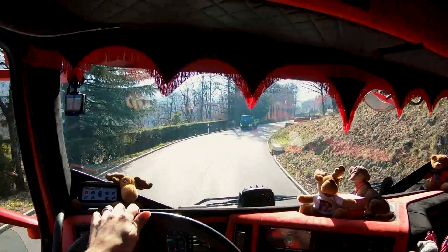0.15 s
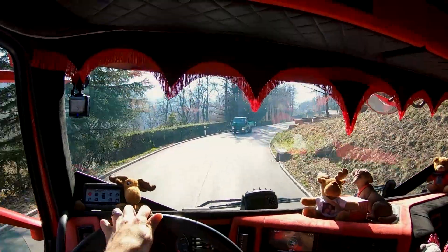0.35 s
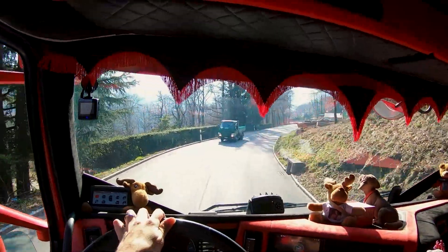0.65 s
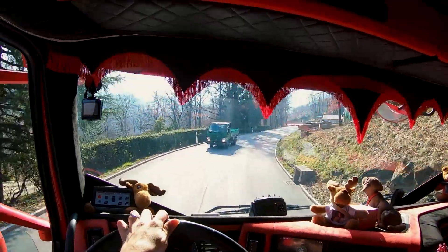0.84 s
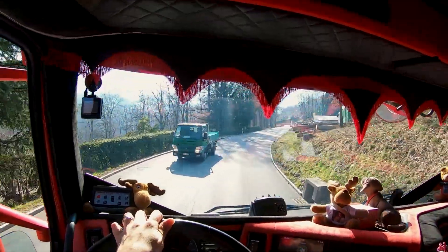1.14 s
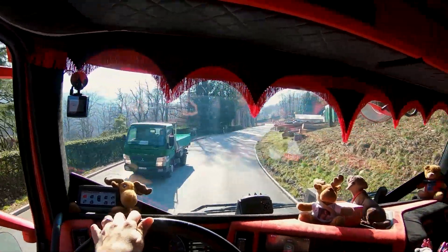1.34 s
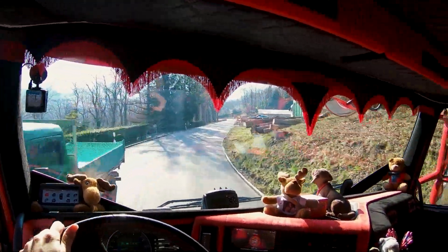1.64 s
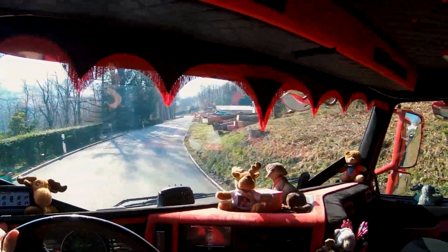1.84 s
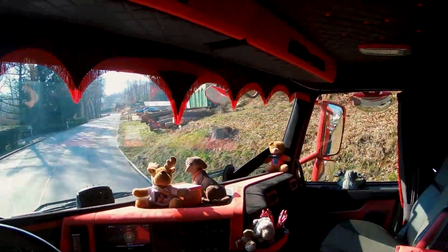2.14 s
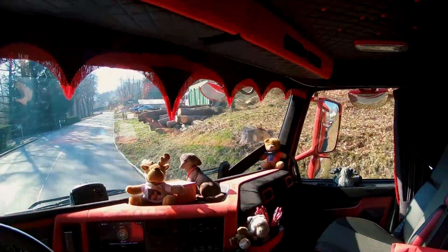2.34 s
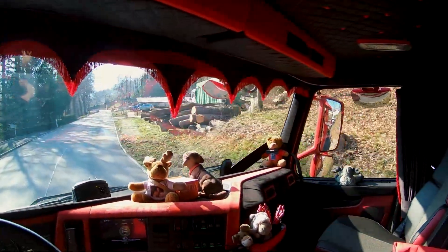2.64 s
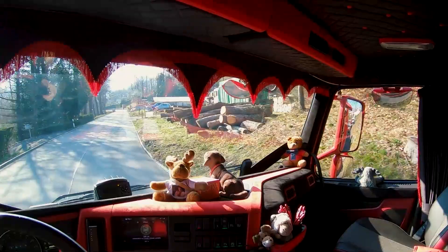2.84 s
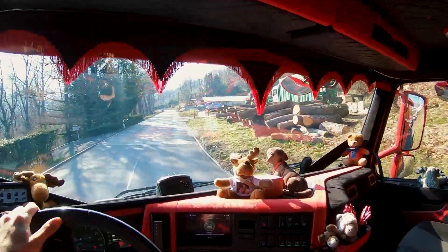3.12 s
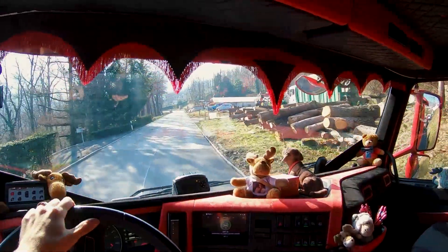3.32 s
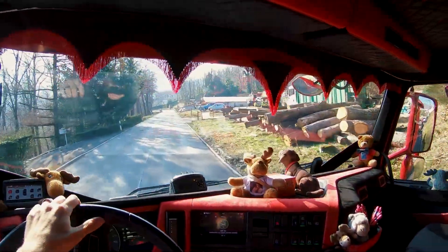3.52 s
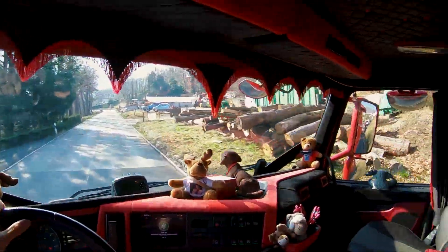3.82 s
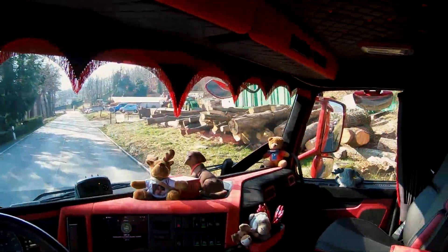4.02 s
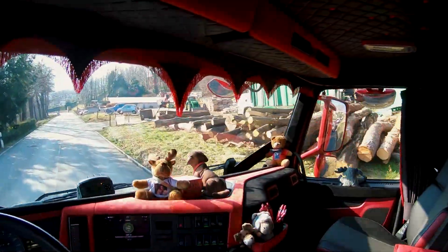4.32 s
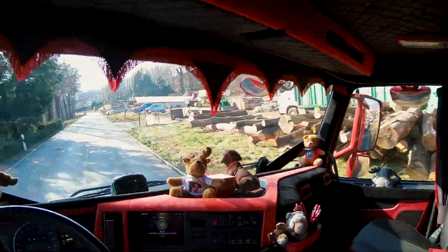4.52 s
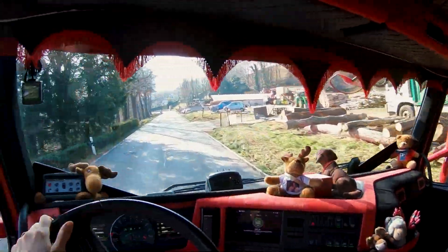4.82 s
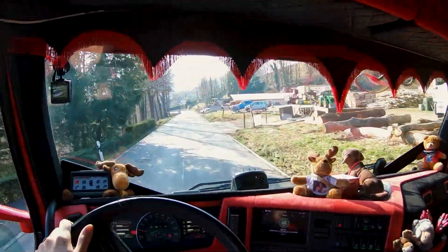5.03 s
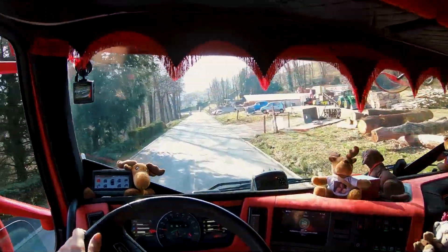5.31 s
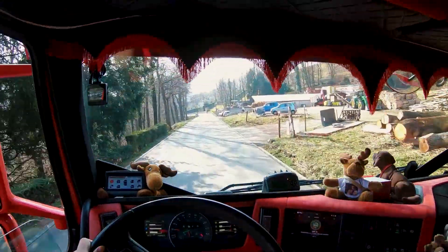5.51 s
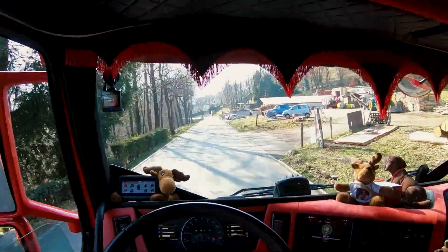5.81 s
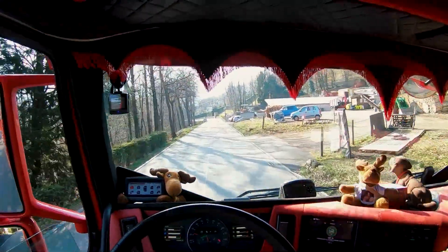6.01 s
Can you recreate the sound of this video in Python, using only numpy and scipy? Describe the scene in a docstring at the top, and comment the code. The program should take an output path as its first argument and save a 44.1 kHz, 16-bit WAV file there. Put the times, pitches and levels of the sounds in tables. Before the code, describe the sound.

Inside a truck cab, a booming diesel eases down, a small oncoming truck whooshes past, then the engine pulls up with growl and rising turbo whistle.

```python
"""A diesel engine booms on the overrun (the truck pushing the engine), heard in the cab with a window open.
It goes quiet, then pulls up in speed with clatter, growl, gear whine and a rising turbo whistle.
Engine tones are waves locked to the engine cycle; clatter is noise pulsed by the firings and coloured.
A small oncoming truck hisses past: coloured noise and tyre hums whose level follows its distance.
Filtered noise makes the road rumble, the cab booms and the short ticks of loose trim."""
import sys
import numpy as np
from scipy import signal
from scipy.fft import rfft, irfft
from scipy.io import wavfile

SR = 44100
rng = np.random.default_rng(int(sys.argv[2]) if len(sys.argv) > 2 else 0)


def digitize_waveform(pressure):
    """Quantize a signal to 16-bit integers and store it at the path in sys.argv[1].

    Rows of a 2-D input are taken as channels; values are limited to [-1, 1].
    """
    field = np.atleast_2d(pressure).T
    bounded = np.clip(field, -1, 1)
    quanta = np.round(bounded * 32767).astype(np.int16)
    wavfile.write(sys.argv[1], SR, quanta)


N = 271656
T = np.arange(N) / SR
HZ = np.fft.rfftfreq(N, 1 / SR)

# "Order" means a multiple of the engine cycle rate; one cycle is six firings, or two turns of the crank.
# half_s is the time from the middle of a swell until it has faded to 37 %.

# engine speed: time_s, firing_hz
ENGINE_SPEED = [(0.0, 61.0), (0.4, 58.6), (0.75, 56.54), (1.1, 54.47), (1.45, 52.74), (1.8, 52.82),
                (2.3, 53.84), (2.8, 54.93), (3.2, 56.44), (3.66, 57.81), (4.1, 60.38), (4.5, 63.18),
                (4.9, 66.19), (5.35, 70.17), (5.8, 74.32), (6.16, 75.29)]
# engine load: time_s, load (no unit: 0 on the overrun, 1 pulling, 2 on full boost)
ENGINE_LOAD = [(1.74, 0), (1.92, 0.37), (2.6, 1.076), (4.75, 0.97), (4.95, 1.37), (5.6, 1.47)]
# strong engine tones: order (no unit), overrun_db, pulling_db, boost_db
STRONG_ORDERS = [(6, -2, -10.5, 2), (7, -18, -13, -7), (8, -17, -13, 20), (9, 4, -3, 13), (10, -12, 2, 7),
                 (11, -5, -3, 7), (12, 7, 7.5, 14), (13, 3, 1, 4), (14, -2, -3, 4), (15, 18.5, 9, -3),
                 (16, 2, -3, 8), (17, 7, -1, -2), (18, 7, -3, 6), (21, 11, 7, 7), (24, 6, 1, 15),
                 (26, 2, 3, 10), (27, 12, 2, -3), (28, 1, 4, -3), (30, -2, 1, 1), (32, -12, -1, -4),
                 (34, -3, -3, -2), (36, 0, -12, -7), (38, 5, -9, -9), (39, 0, -14, -10), (40, 0, -15, -12),
                 (42, -5, -12, 10), (44, -2, -10, -6)]
# how the cab passes the drone: pitch_hz, level_db
CAB_RESPONSE = [(50, 15), (65, 20.5), (95, 1), (120, 2.5), (141, 3), (151, 3), (165, 5.5), (185, -10.5),
                (215, -3.5), (236, -17.5), (254, -2), (267, -9.5), (292, -5.5), (335, -8.5), (380, -6.5),
                (425, -18.5), (470, -2), (520, -20)]
# delay of the drone on the left: lag_s on the overrun, then lag_s pulling
LEFT_LAG_S = [0.00013, 0.00004]
# clatter colour: pitch_hz, overrun_db, pulling_db
CLATTER_TONE = [(150, -29.5, -18.5), (336, -5.5, -7.5), (383, -8, -13), (542, 2, 0.5), (865, 2, -0.5),
                (1220, 1.5, -1), (1434, -3.5, -4.5), (1940, -7, -8), (2410, -14, -15), (3140, -15, -14.5),
                (3230, -19, -18.5), (4210, -19.5, -21), (4860, -29, -29.5), (10030, -52, -60)]
# ringing of engine block and covers: pitch_hz, width_hz, overrun_db, pulling_db, boost_db
BLOCK_RINGS = [(649, 23, -17.5, -14, -25), (963, 15.8, -7, -10.5, -10), (1254, 47, -16.5, -11, -16),
               (1625, 90, -27, -10, -16), (1974, 100, -27.5, -23, -7), (2840, 84, -32, -21.5, -33),
               (4290, 160, -36, -33.5, -23), (5420, 220, -52, -38, -21)]
# combustion growl under load: order (no unit, rounded when used), pulling_db, boost_db
GROWL_ORDERS = [(48, -58, -48), (54, -60, -42), (57, -60.5, -51), (60, -50, -53), (65.7, -49.5, -58),
                (68.3, -61, -53), (69, -53, -49), (70.6, -58, -42), (73.7, -53, -51), (78.9, -57.5, -54),
                (80.4, -63, -46), (84.2, -52.5, -50)]
# gearbox casing resonances: pitch_hz, width_hz, level_db
CASING_RINGS = [(1148, 64, -44.5), (1297, 31, -43)]
# turbo speed: time_s, whistle_hz
TURBO_SPEED = [(0, 4660), (.48, 4570), (1.2, 4110), (1.5, 4030), (1.75, 3900), (2.8, 3520), (3.5, 3630),
               (4.2, 4300), (5, 5850), (5.8, 7880), (5.95, 8010), (6.16, 7930)]
# intake duct resonances, heard off the throttle: pitch_hz, width_hz, added level_db
DUCT_RINGS = [(4650, 30, 6.5), (4075, 36, 15)]
# intake hiss colour: pitch_hz, level_db
INTAKE_COLOUR = [(1500, -15), (3500, 0), (4400, -3), (4900, 0.5), (5500, 0.5), (7500, -1.5), (9500, -4.5),
                 (11000, -17), (15000, -33.5)]
# panels that sing out for a moment: middle_s, half_s, pitch_hz, level_db
PANEL_TONES = [(0.355, 0.42, 964, -45.5), (3.782, 0.32, 982, -40), (4.33, 0.09, 980, -48),
               (4.88, 0.24, 1570, -45), (5.1, 0.21, 962, -42), (5.383, 0.15, 633, -40),
               (5.48, 0.24, 958, -43), (5.63, 0.32, 1930, -44), (5.66, 0.12, 1750, -46),
               (5.8, 0.25, 839, -39)]
# oncoming truck's tyre roar colour: pitch_hz, level_db
ROAR_COLOUR = [(170, -0.5), (280, 1), (440, -4), (700, -4), (1000, 1), (1450, -2), (2300, -3.5),
               (3300, -10), (4500, -30), (9000, -59)]
# oncoming truck's hiss colour: pitch_hz, level_db
HISS_COLOUR = [(1200, -22.5), (2500, -4.5), (4000, 2), (5200, -2.5), (7700, 1.5), (9500, -4.5),
               (10300, -11.5), (11000, -21), (15000, -29)]
# oncoming truck's tread hums: pitch_hz, ahead_db, behind_db
TREAD_HUMS = [(690, -13, -11), (1110, -15, -4), (1430, -6, -3.5)]
# open window's resonances as the truck passes: pitch_hz, width_hz, level_db (relative)
WINDOW_RINGS = [(680, 45, 3), (1310, 56, -1), (1573, 75, -2), (1930, 44, 1), (2460, 53, -16),
                (3223, 70, -6), (3800, 100, -13)]
# surges of the passing sound through the window: middle_s, half_s, added level_db
WINDOW_SURGES = [(1.792, 0.019, 0.5), (1.942, 0.05, 1), (2.108, 0.04, 1), (2.25, 0.098, 2.5)]
# cab shaking colour: pitch_hz, level_db
CAB_SHAKE = [(8, -20), (16, -2), (28, 0), (40, -7), (55, -13), (90, -30), (300, -70), (3000, -130)]
# tyre rumble colour: pitch_hz, level_db
TYRE_RUMBLE = [(25, -17.5), (50, -5), (70, -3), (92, -16.5), (120, -7.5), (155, -3.5), (195, -15.5),
               (320, -19), (420, -25), (800, -43), (3000, -73.5), (12000, -110)]
# passing rises and falls in the cab's deep shaking, one as the truck passes: middle_s, half_s, added level_db
SHAKE_SWELLS = [(0.72, 0.25, -5.5), (1.928, 0.27, 5.5), (2.377, 0.04, 7), (2.58, 0.097, -14),
                (3.395, 0.5, 3.5), (4.598, 0.64, 6), (5.76, 0.18, 7)]
# booms of the cab's air, set off by road bumps: middle_s, half_s, pitch_hz, width_hz, level_db
CAB_BOOMS = [(1.867, 0.17, 257, 13, -37.5), (3.303, 0.51, 106, 9, -33), (3.412, 0.24, 257, 6.2, -38.5),
             (3.6, 0.22, 69, 5.4, -33)]
# cab trim ticks: start_s, snap_db, ring_db, decay_s (time to fall by 60 dB)
TRIM_TICKS = [(3.193, -56, -64, .05), (3.643, -54, -49.5, .1), (3.765, -62, -54, .06),
              (4.319, -50, -66, .035), (4.434, -49, -53, .11), (5.826, -49, -60, .025),
              (6.143, -48, -56, .035)]
# tick snap colour: pitch_hz, level_db
SNAP_COLOUR = [(1500, -31), (3800, 3), (6000, 4), (8500, 2), (11000, -23), (15000, -37)]
# likeness of left and right: pitch_hz, likeness (no unit, 1 = same)
SIDE_LIKENESS = [(60, 1), (140, .995), (300, .97), (500, .8), (1000, .6), (2000, .68), (4000, .52),
                 (8000, .38), (14000, .5)]
# level lean of the sides: pitch_hz, left minus right level_db
SIDE_LEAN = [(100, -.2), (330, -.5), (600, -6), (1100, -6), (2500, -3.2), (5000, -1.5), (10000, -2)]
# timing lead of the left side: pitch_hz, lead_radians
SIDE_LEAD = [(60, -.03), (280, -.05), (400, -.3), (640, -.45), (970, .35), (1400, 0), (2500, -.3),
             (5000, -1.3), (8000, -2.2), (10000, -2.6)]

EDGE_HZ = 15000  # upper edge of the whole sound
CRUISE_HZ = 58  # firings a second at which the base levels hold
# between overrun and pull the engine runs slack and quiet
SLACK_FROM_S, SLACK_FALL_S, SLACK_UNTIL_S, SLACK_RISE_S = 1.786, 0.23, 2.78, 0.58
# base levels, their RISE per doubling of engine speed, their drop while SLACK, their change on the OVERRUN
DRONE_DB, DRONE_RISE_DB, DRONE_SLACK_DB, DRONE_OVERRUN_DB = -43, 4.5, 8, 0.5
CLATTER_DB, CLATTER_RISE_DB, CLATTER_SLACK_DB = -35.5, 6.5, 3.5
CLATTER_OVERRUN_DB, CLATTER_BOOST_DB = -1.5, 4
ROAD_DB, ROAD_RISE_DB, ROAD_SLACK_DB = -33, 8.5, 3.5
ROAD_OVERRUN_DB = -0.5  # overrun against pulling, half applied each way
SHAKE_DB, SHAKE_RISE_DB, SHAKE_PULL_DB = -31, 8.5, 0.5
GEAR_OVERRUN_DB = -1.5  # unloaded teeth whine less
LOWEST_ORDER, TOP_ORDER = 6, 44
# weak orders share a level that falls per order; those fitting neither crank turn nor bank are weaker
WEAK_ORDER_DB, WEAK_FALL_DB, WEAK_OVERRUN_FALL_DB, OFF_BEAT_DB = 3.5, 0.12, 0.3, -2
WAVER_DB = 1.3  # slow wavering of each order's level
# slack driveline's knock; KNOCK_TURN is its place in the crank turn (0-1)
KNOCK_DB, KNOCK_HZ, KNOCK_DECAY_S, KNOCK_TURN = -31, 373.5, 0.0049, 0.86
# whistle and intake air at full spool (turbo speed), with their rise per doubling of turbo speed
FULL_SPOOL_HZ = 8000
WHISTLE_DB, WHISTLE_RISE_DB = -58, 16.5
AIR_DB, AIR_RISE_DB, AIR_OVERRUN_DB = -53, 7, -3
# propeller shaft: rate against the firing rate, steady level, and a swell as it takes up the load
SHAFT_RATIO, SHAFT_DB, SHAFT_SWELL_DB, SHAFT_S, SHAFT_HALF_S = 0.875, -40, 9, 2.9, 1
# oncoming truck: when it draws level, closing speed, distance from the window
PASS_S, PASS_M_PER_S, PASS_GAP_M = 1.933, 22.8, 1.62
# roar when level, and fall per doubling of distance ahead (behind the windscreen) and behind
ROAR_DB, ROAR_AHEAD_DB, ROAR_BEHIND_DB = -30.5, 4.5, 3.5
# hiss when level, fall per doubling of distance, and further loss per metre
HISS_DB, HISS_FALL_DB, HISS_LOSS_DB_PER_M = -39.5, 5, 0.5
# base level of the tread hums, fall per doubling of distance, and half_s of their swell
TREAD_DB, TREAD_FALL_DB, TREAD_HALF_S = -34, 1, 0.34
# Doppler pitch glide: share up and then down, middle, half length
DOPPLER_SHARE, GLIDE_S, GLIDE_HALF_S = 0.1, 1.99, 0.07
WINDOW_DB, WINDOW_HALF_S = -37.5, 0.1
TRIM_HZ, TRIM_WIDTH_HZ = 4200, 750


def amp(db):
    """Turns decibels into gain."""
    return 10 ** (np.asarray(db) / 20)


def unit(x):
    """Scales to an rms (average strength) of 1."""
    return x / np.sqrt(np.mean(x ** 2) + 1e-20)


def curves(rows):
    """Draws each column of a time table, sample by sample."""
    s, *columns = np.transpose(rows)
    return [np.interp(T, s, column) for column in columns]


def read(rows, hz):
    """Reads each column of a frequency table at hz."""
    table_hz, *columns = np.transpose(rows)
    return np.squeeze([np.interp(np.log(hz + 1), np.log(table_hz + 1), column) for column in columns])


def colour(rows):
    """Gain at every frequency from a one-column colour table."""
    return amp(read(rows, HZ))


def ramp(start_s, length_s):
    """Goes from 0 to 1 in a straight line."""
    return np.clip((T - start_s) / length_s, 0, 1)


def swell(middle_s, half_s):
    """A smooth hump in time, 1 at its middle."""
    return np.exp(-((T - middle_s) / half_s) ** 2)


def humps_db(rows):
    """Adds up a table of passing level changes."""
    return sum(db * swell(s, half_s) for s, half_s, db in rows)


def wander(hz):
    """Slow random drift of rms 1, up to about hz changes a second."""
    steps = rng.standard_normal(N // 64 + 1)  # one step per 64 samples
    steps_hz = np.fft.rfftfreq(len(steps), 64 / SR)
    slow = irfft(rfft(steps) / (1 + (steps_hz / hz) ** 4), len(steps))
    return np.interp(np.arange(N), np.arange(len(steps)) * 64, unit(slow))


def noise():
    """Two unrelated white noises."""
    return rng.standard_normal((2, N))


def resonance(hz, width_hz):
    """The gain of one steep resonance at every frequency."""
    return 1 / (1 + 1j * (HZ - hz) / width_hz) ** 2


def closeness(hz, centre_hz, width_hz):
    """How near a gliding tone is to a resonance, 1 at its centre."""
    return 1 / (1 + ((hz - centre_hz) / width_hz) ** 2)


def heard(pair, gain):
    """Colours two unrelated signals and shares them between left and right; their average has rms 1."""
    a, b = rfft(pair) * gain
    alike = np.clip(read(SIDE_LIKENESS, HZ), 0, 1)
    lean = amp(read(SIDE_LEAN, HZ) / 2)
    right = alike * a + np.sqrt(1 - alike ** 2) * b
    right = right * np.exp(-1j * read(SIDE_LEAD, HZ))
    out = irfft(np.array([a * lean, right / lean]), N)
    return out / np.sqrt(np.mean(out.mean(0) ** 2) + 1e-20)


def whine(hz, db, width_hz, direct=1):
    """A tone reaching each side directly and by many shifting paths, so that it flutters and blurs."""
    turn = np.exp(2j * np.pi * np.cumsum(hz) / SR)
    paths = np.array([direct + wander(width_hz) + 1j * wander(width_hz) for _ in range(2)])
    return amp(db) * unit((paths * turn).real)


def rattle(cycles, repeat):
    """Noise of which a share repeats with every engine cycle; the rest is new each time."""
    pattern = rng.standard_normal((2, 2048))
    locked = np.array([np.interp(cycles % 1, np.linspace(0, 1, len(p)), p) for p in pattern])
    share = np.clip(repeat, 0, 1)
    return np.sqrt(share / 2) * unit(locked) + np.sqrt(1 - share) * noise()


def drone(cycle_hz, cycles, load, level_db):
    """Uneven cylinders give tones on multiples of the cycle rate, which swell as they cross the cab's boom."""
    out = np.zeros((2, N))
    strong_db = {order: np.interp(load, [0, 1, 2], by_load_db) for order, *by_load_db in STRONG_ORDERS}
    fall_db = np.interp(load, [0, 1], [WEAK_OVERRUN_FALL_DB, WEAK_FALL_DB])
    left_cycles = cycles - cycle_hz * np.interp(load, [0, 1], LEFT_LAG_S)
    at_sides = np.array([left_cycles, cycles])
    for order in range(LOWEST_ORDER, TOP_ORDER + 1):
        waver_db = WAVER_DB * wander(5)
        slip = .05 * wander(6)  # small phase drift, radians
        off_beat = np.gcd(order, 6) == 1
        weak_db = WEAK_ORDER_DB - fall_db * order + OFF_BEAT_DB * off_beat
        db = strong_db.get(order, weak_db) + read(CAB_RESPONSE, order * cycle_hz) + waver_db
        phase = 2 * np.pi * (order * at_sides + rng.random()) + slip
        out += np.sqrt(2) * amp(db) * np.cos(phase)
    return out * amp(level_db) * amp([[-.25], [.25]])  # right slightly louder


def clatter(cycles, load, level_db, repeat=0.4, knock=0.33, knock_decay=0.11, uneven=0.23, throb=0.073,
            flicker_db=0.76):
    """Each firing knocks the block, whose covers ring."""
    firings = 6 * cycles
    strength = 1 + uneven * rng.standard_normal(6)[firings.astype(int) % 6]  # one per cylinder
    blows = 1 + knock * strength * np.exp(-(firings % 1) / knock_decay)
    drive = blows * rattle(cycles, repeat)
    overrun, pulling = (heard(drive, amp(db)) for db in read(CLATTER_TONE, HZ))
    pull = np.clip(load, 0, 1)
    out = (1 - pull) * overrun + pull * pulling
    # on the overrun the covers are shaken once a cycle
    throbbing = 1 + throb * (1 - pull) * np.cos(2 * np.pi * cycles)
    shaken = blows * rattle(cycles, repeat) * throbbing
    for hz, width_hz, *by_load_db in BLOCK_RINGS:
        out += amp(np.interp(load, [0, 1, 2], by_load_db)) * heard(shaken, resonance(hz, width_hz))
    return amp(level_db + flicker_db * wander(6.3)) * out


def growl(cycles, load):
    """Hard combustion repeats with the cycle, so it stands out of the clatter as a stack of clean tones."""
    out = np.zeros((2, N))
    for order, *by_load_db in GROWL_ORDERS:
        level = amp(np.interp(load, [1, 2], by_load_db) + 3.1 * wander(4.5))
        offset = rng.random() + .1 * rng.standard_normal((2, 1))  # differs a little between the sides
        out += np.sqrt(2) * level * np.cos(2 * np.pi * (round(order) * cycles + offset))
    return out * np.clip(load, 0, 1) ** 2


def backlash(cycle_hz, cycles, pull):
    """The slack driveline knocks dully on every turn of the crank, gone once the engine pulls."""
    since_s = ((2 * cycles - KNOCK_TURN) % 1) / (2 * cycle_hz)
    age = since_s / KNOCK_DECAY_S
    ring = age * np.exp(1 - age) * np.sin(2 * np.pi * KNOCK_HZ * since_s)
    ring = signal.lfilter(*signal.butter(2, 2 * KNOCK_HZ, fs=SR), ring)  # dulls it
    return amp(KNOCK_DB + 2 * wander(11)) * np.clip(1 - 2 * pull, 0, 1) * ring


def gears(firing_hz, pull):
    """Meshing teeth whine, loudest where their pitch meets a resonance of the gearbox casing."""
    mesh_hz = 21 * firing_hz  # 63 teeth meet in each turn of the crank
    casing = sum(amp(db) * closeness(mesh_hz, hz, width_hz) for hz, width_hz, db in CASING_RINGS)
    tone = whine(mesh_hz, GEAR_OVERRUN_DB * (1 - pull), width_hz=22)
    return casing * tone * amp([[-1], [1]])


def turbo(pull):
    """The compressor whistles and draws hissing air, both louder the faster it spins."""
    hz, = curves(TURBO_SPEED)
    spool = np.log2(hz / FULL_SPOOL_HZ)
    duct_db = sum(db * closeness(hz, centre_hz, width_hz) for centre_hz, width_hz, db in DUCT_RINGS)
    whistle_db = WHISTLE_DB + WHISTLE_RISE_DB * spool + duct_db * (1 - pull)
    whistle = whine(hz, whistle_db, width_hz=65, direct=1.6 - 1.2 * pull)
    air_db = AIR_DB + AIR_RISE_DB * spool + AIR_OVERRUN_DB * (1 - pull)
    return whistle + amp(air_db + 1.2 * wander(16)) * heard(noise(), colour(INTAKE_COLOUR))


def shaft(firing_hz):
    """The propeller shaft gives a deep hum geared to the engine."""
    db = SHAFT_DB + SHAFT_SWELL_DB * swell(SHAFT_S, SHAFT_HALF_S) + 1.4 * wander(5)
    return np.sqrt(2) * amp(db) * np.sin(2 * np.pi * np.cumsum(SHAFT_RATIO * firing_hz) / SR)


def panels(left_db=3):
    """Each panel swells into a fluttering tone and dies away again."""
    tones = sum(swell(s, half_s) * whine(np.full(N, hz), db, width_hz=21) for s, half_s, hz, db in PANEL_TONES)
    return tones * amp([[left_db], [-left_db]])


def passing_truck(gust_db=1.1):
    """Hiss peaks sharply as the truck draws level; the roar lingers, the tread hums drop in pitch."""
    distance_m = np.hypot(PASS_GAP_M, PASS_M_PER_S * (T - PASS_S))
    doublings = np.log2(distance_m / PASS_GAP_M)
    roar_db = ROAR_DB - doublings * np.where(T < PASS_S, ROAR_AHEAD_DB, ROAR_BEHIND_DB)
    roar = amp(roar_db) * heard(noise(), colour(ROAR_COLOUR))
    hiss_db = HISS_DB - doublings * HISS_FALL_DB - HISS_LOSS_DB_PER_M * (distance_m - PASS_GAP_M)
    hiss = amp(hiss_db) * heard(noise(), colour(HISS_COLOUR))
    window_gain = sum(amp(db) * resonance(hz, width_hz) for hz, width_hz, db in WINDOW_RINGS)
    ring = amp(WINDOW_DB) * swell(PASS_S, WINDOW_HALF_S) * heard(noise(), window_gain)
    receding = np.tanh((T - GLIDE_S) / GLIDE_HALF_S)  # -1 coming, 1 going
    tread = np.zeros((2, N))
    for hz, *by_side_db in TREAD_HUMS:
        gliding_hz = hz * (1 - DOPPLER_SHARE * receding)
        tread += whine(gliding_hz, np.interp(receding, [-1, 1], by_side_db), width_hz=89)
    tread *= amp(TREAD_DB - doublings * TREAD_FALL_DB) * swell(GLIDE_S, TREAD_HALF_S)
    tread *= amp([[2], [-2]])  # louder on the left
    return (roar + ring + tread + hiss) * amp(humps_db(WINDOW_SURGES) + gust_db * wander(35))


def road(speed, pull, slack):
    """Tyre rumble and the cab's deep shaking grow with engine speed; the shaking also rises and falls."""
    shake_db = SHAKE_DB + SHAKE_RISE_DB * speed + SHAKE_PULL_DB * pull + humps_db(SHAKE_SWELLS)
    shake = amp(shake_db) * heard(noise(), colour(CAB_SHAKE))
    rumble_db = ROAD_DB + ROAD_RISE_DB * speed - ROAD_SLACK_DB * slack + ROAD_OVERRUN_DB * (0.5 - pull)
    return shake + amp(rumble_db) * heard(noise(), colour(TYRE_RUMBLE))


def booms():
    """Each bump swells one low resonance of the cab's air, alike on both sides."""
    shaking = rfft(rng.standard_normal(N))
    out = np.zeros(N)
    for s, half_s, hz, width_hz, db in CAB_BOOMS:
        out += amp(db) * swell(s, half_s) * unit(irfft(shaking * resonance(hz, width_hz), N))
    return out


def trim():
    """Loose cab fittings give short bright ticks: a snap of noise and a ring, dying away together."""
    snap = heard(noise(), colour(SNAP_COLOUR))
    ring = heard(noise(), resonance(TRIM_HZ, TRIM_WIDTH_HZ))
    out = np.zeros((2, N))
    for s, snap_db, ring_db, decay_s in TRIM_TICKS:
        fade = (T >= s) * amp(-60 * np.clip(T - s, 0, 1) / decay_s)
        out += fade * (amp(snap_db) * snap + amp(ring_db) * ring)
    return out


def scene():
    """Engine speed and load drive the engine, gear and road sounds; the other layers are added."""
    firing_hz, = curves(ENGINE_SPEED)
    cycle_hz = firing_hz / 6
    cycles = np.cumsum(cycle_hz) / SR
    speed = np.log2(firing_hz / CRUISE_HZ)  # doublings above cruising speed
    load, = curves(ENGINE_LOAD)
    pull = np.clip(load, 0, 1)
    slack = ramp(SLACK_FROM_S, SLACK_FALL_S) - ramp(SLACK_UNTIL_S, SLACK_RISE_S)
    drone_db = DRONE_DB + DRONE_RISE_DB * speed - DRONE_SLACK_DB * slack + DRONE_OVERRUN_DB * (1 - pull)
    effort_db = np.interp(load, [0, 1, 2], [CLATTER_OVERRUN_DB, 0, CLATTER_BOOST_DB])
    clatter_db = CLATTER_DB + CLATTER_RISE_DB * speed - CLATTER_SLACK_DB * slack + effort_db
    engine = drone(cycle_hz, cycles, load, drone_db) + clatter(cycles, load, clatter_db)
    engine += growl(cycles, load) * amp(-CLATTER_SLACK_DB * slack)
    driveline = backlash(cycle_hz, cycles, pull) + gears(firing_hz, pull) + shaft(firing_hz)
    cab = panels() + booms() + trim()
    return engine + driveline + turbo(pull) + passing_truck() + road(speed, pull, slack) + cab


def record(dry):
    """A steep low-pass filter removes what lies above the upper edge."""
    low_pass = signal.firwin(511, EDGE_HZ, window=("kaiser", 9), fs=SR)
    return signal.oaconvolve(dry, low_pass[None], "same")


dry = scene()
out = record(dry)
digitize_waveform(out)
```